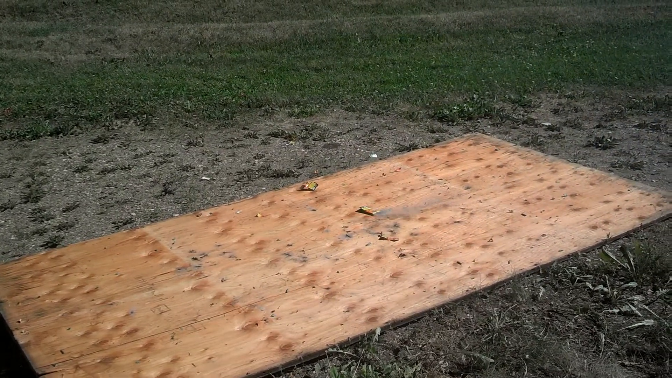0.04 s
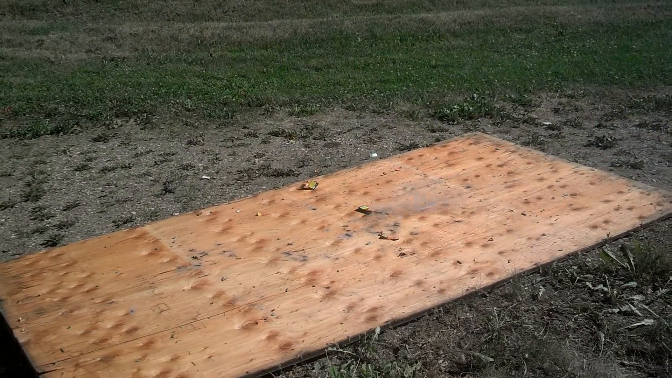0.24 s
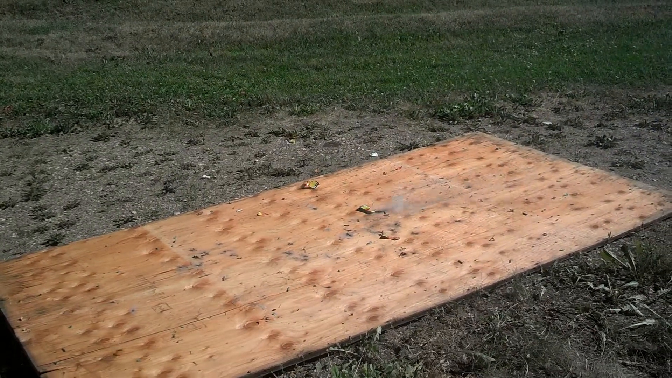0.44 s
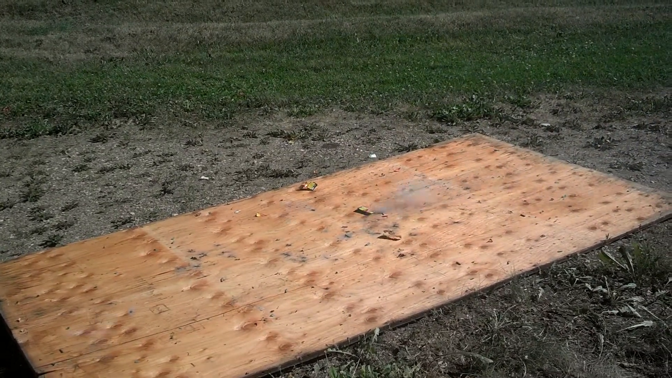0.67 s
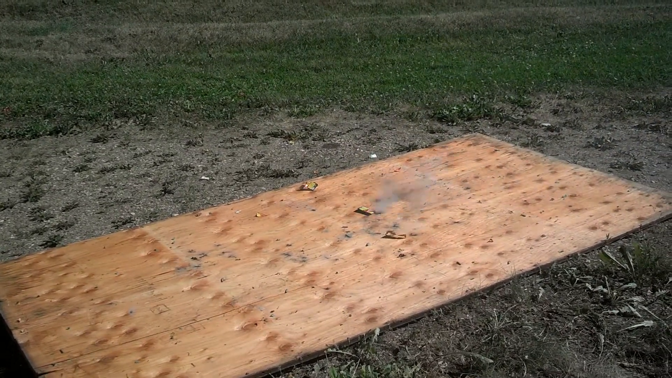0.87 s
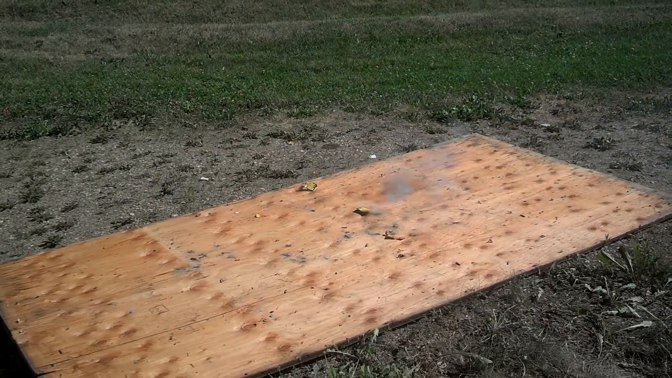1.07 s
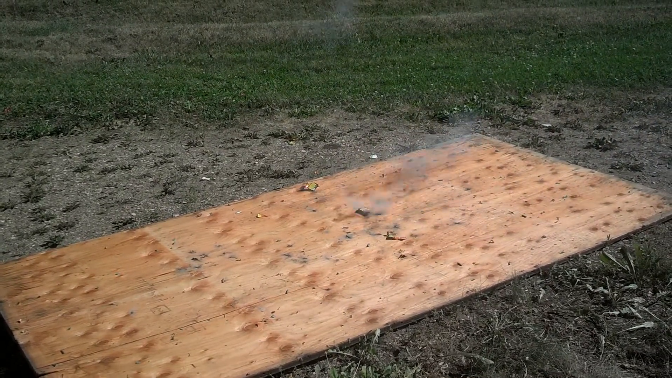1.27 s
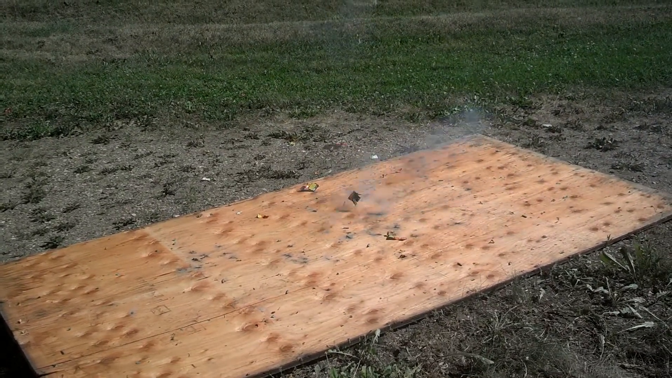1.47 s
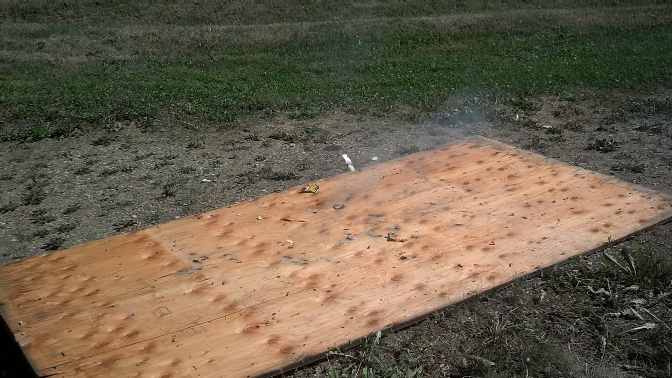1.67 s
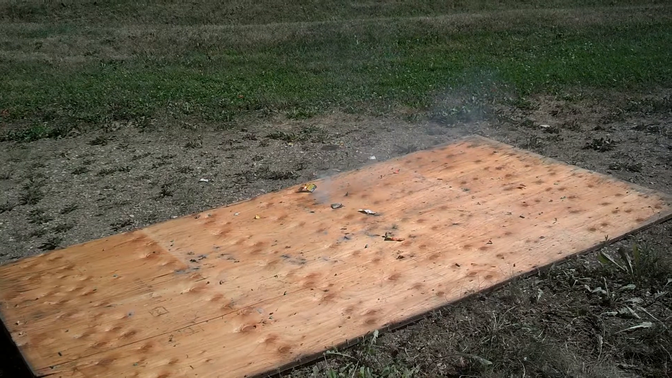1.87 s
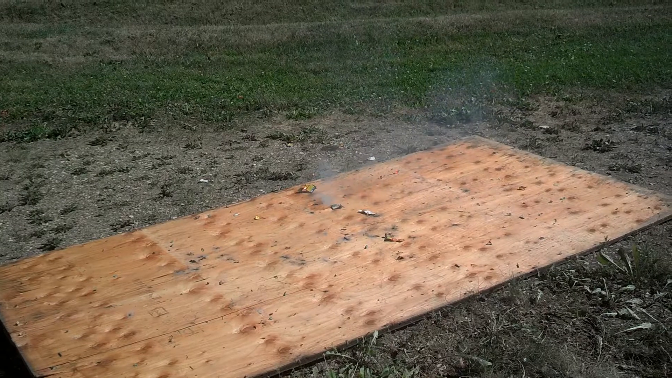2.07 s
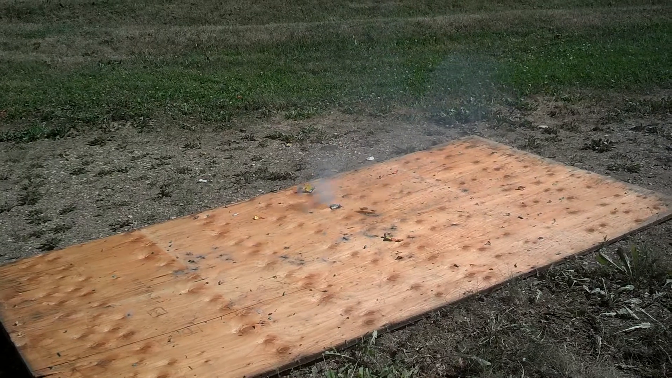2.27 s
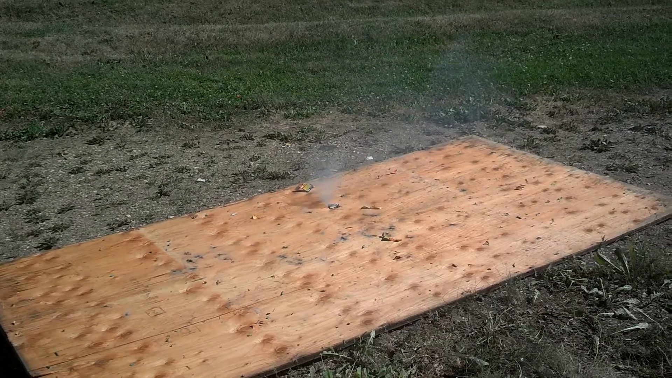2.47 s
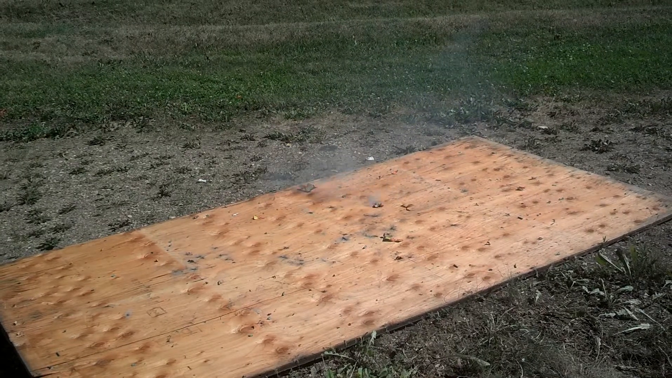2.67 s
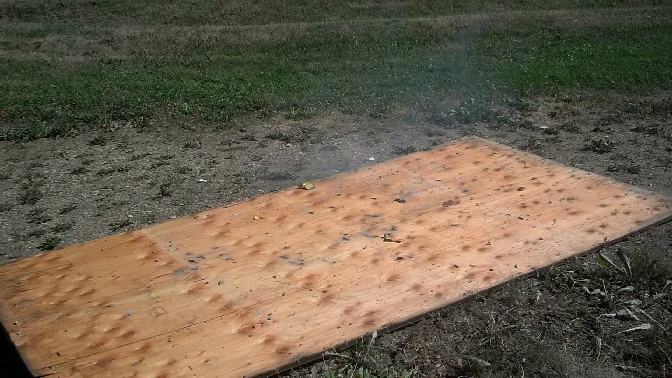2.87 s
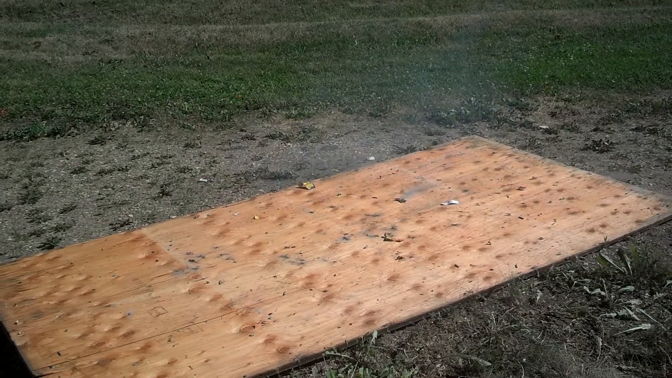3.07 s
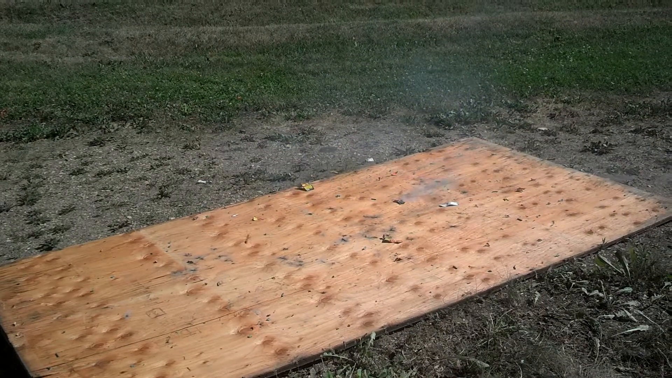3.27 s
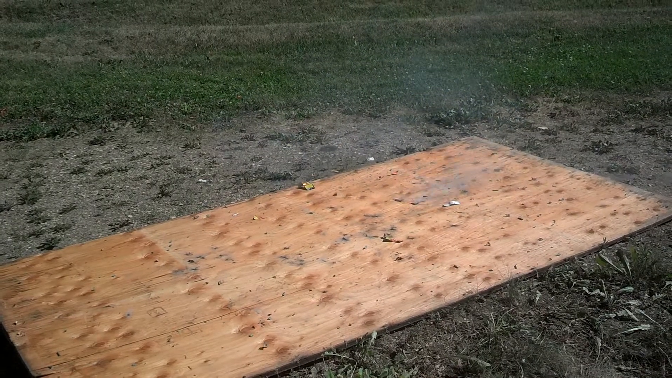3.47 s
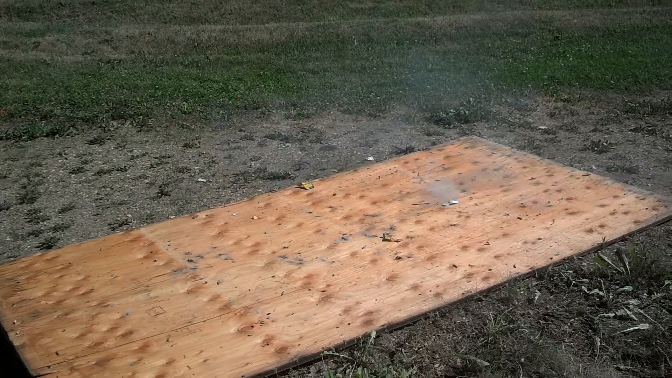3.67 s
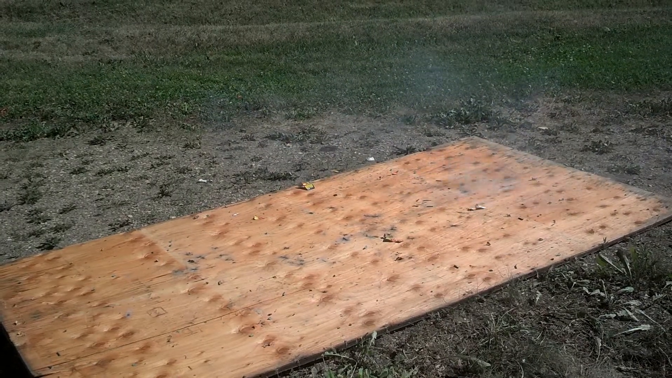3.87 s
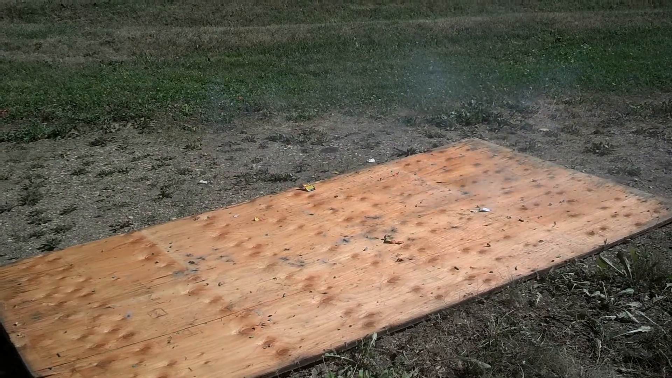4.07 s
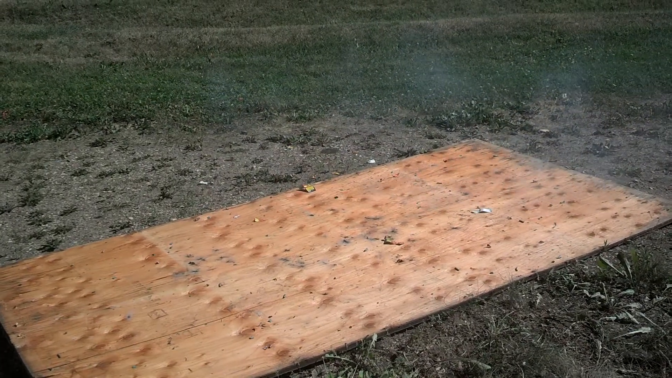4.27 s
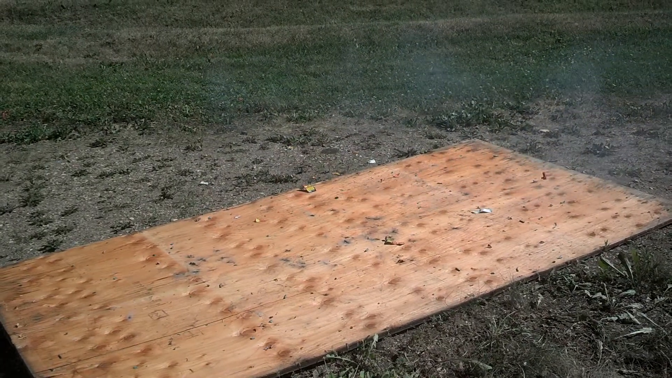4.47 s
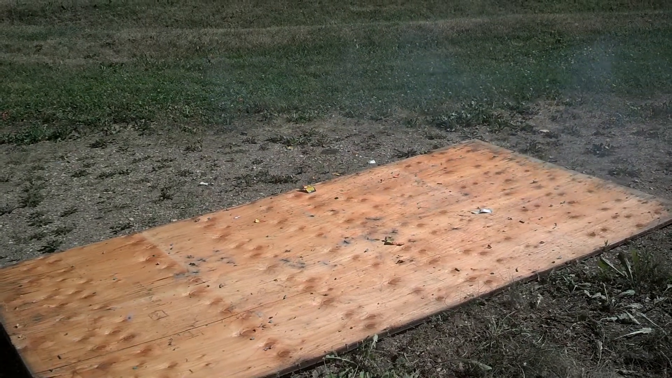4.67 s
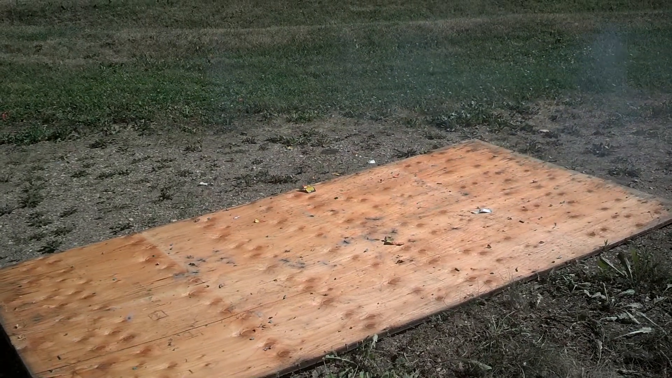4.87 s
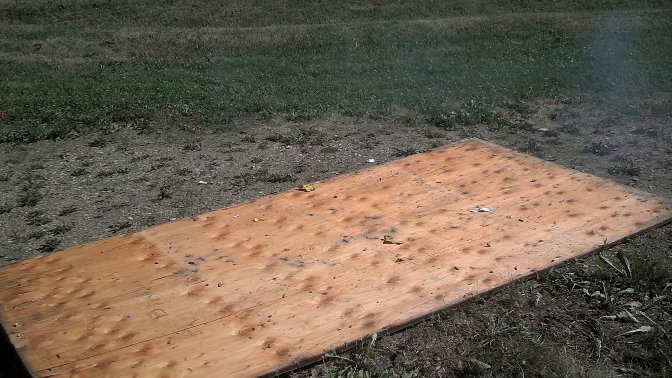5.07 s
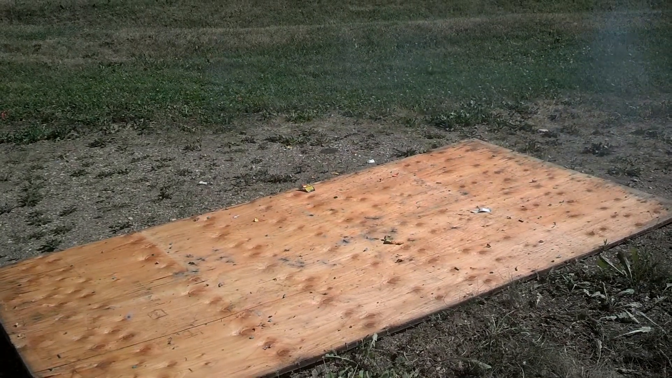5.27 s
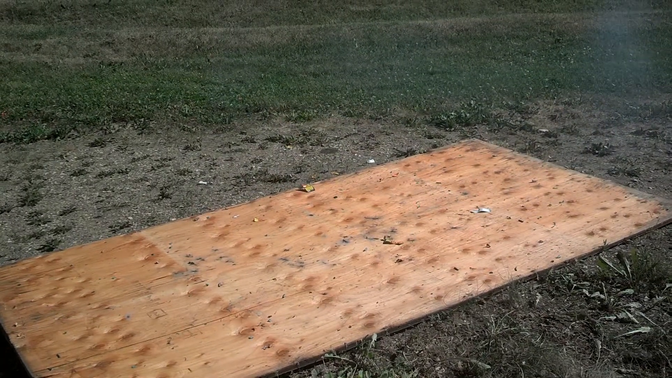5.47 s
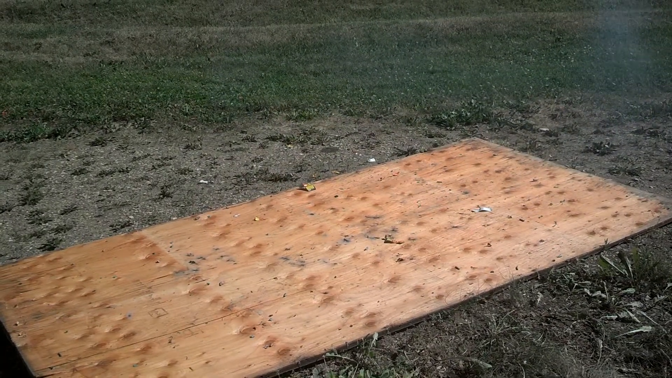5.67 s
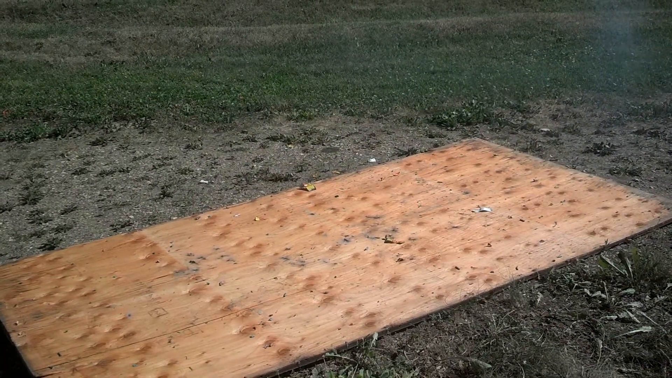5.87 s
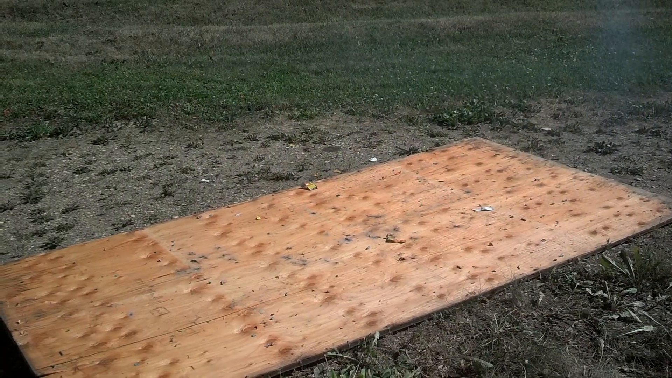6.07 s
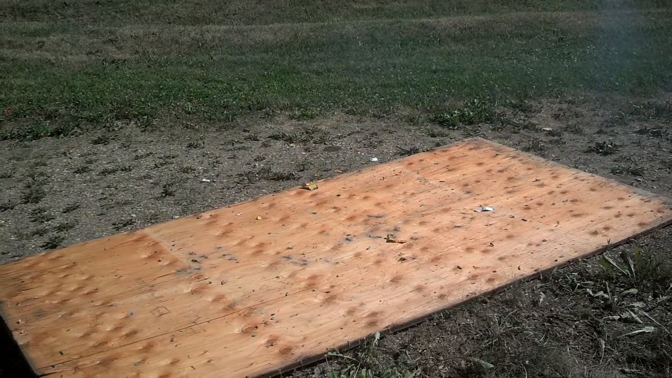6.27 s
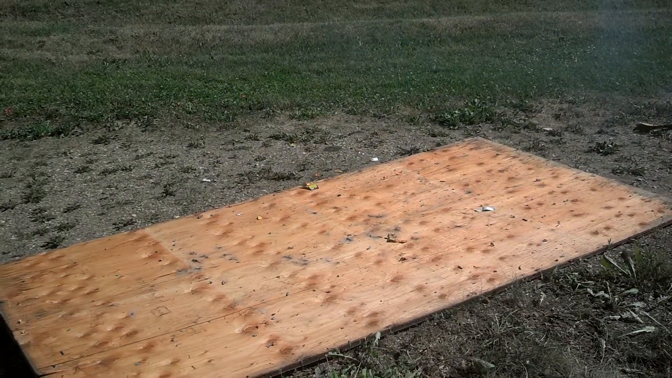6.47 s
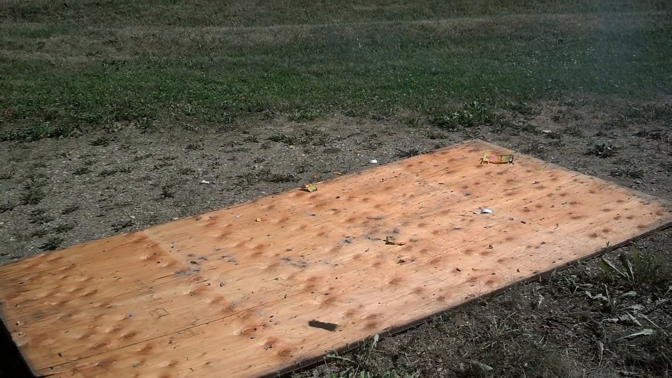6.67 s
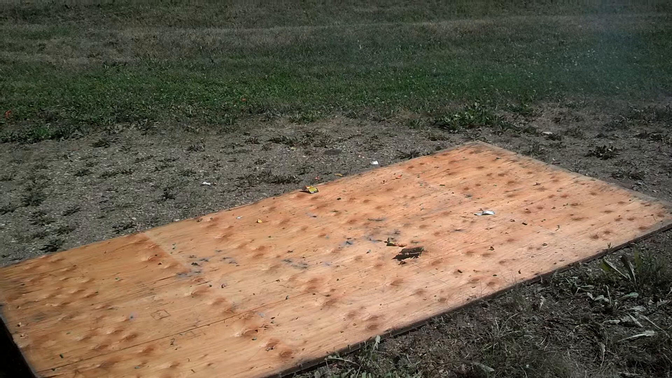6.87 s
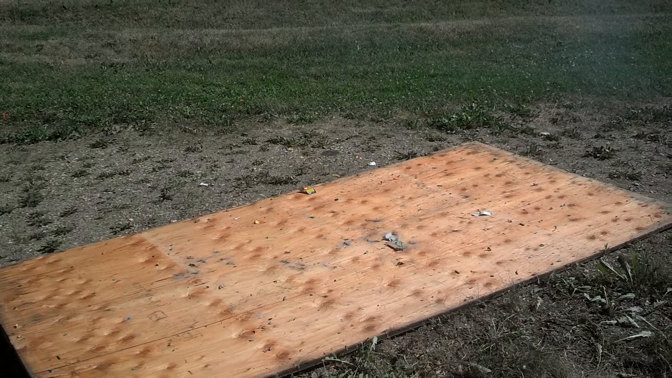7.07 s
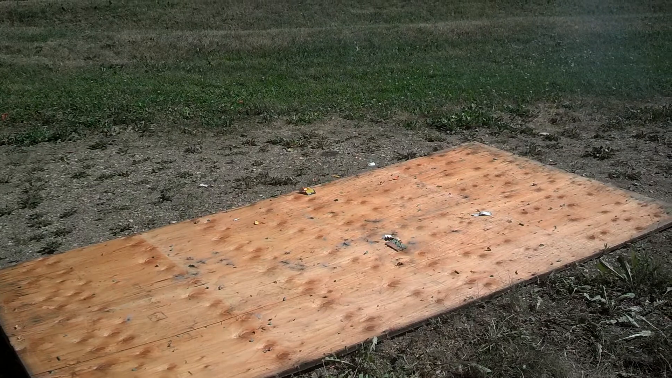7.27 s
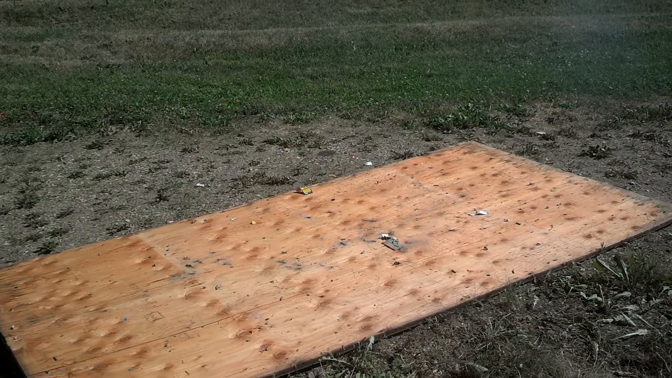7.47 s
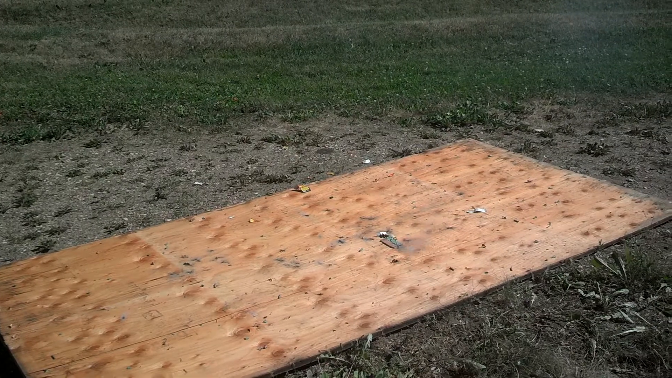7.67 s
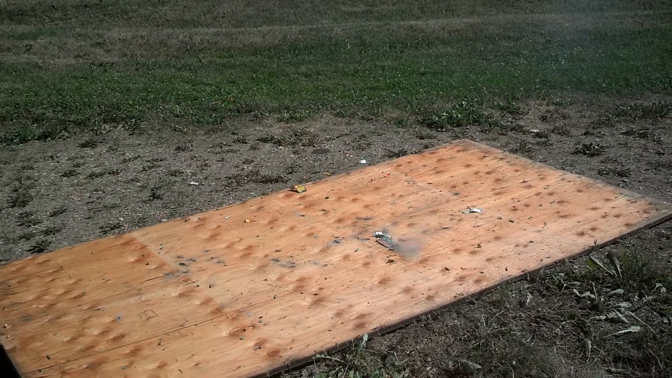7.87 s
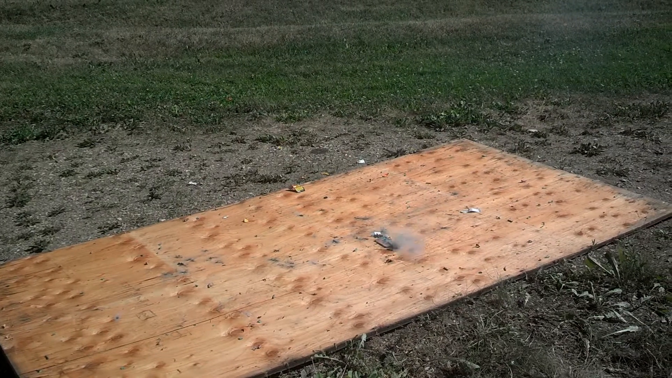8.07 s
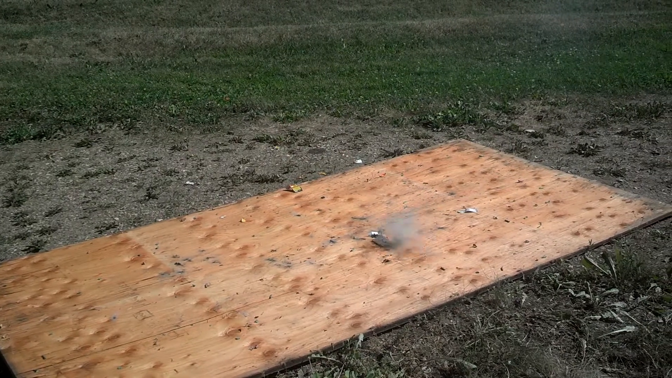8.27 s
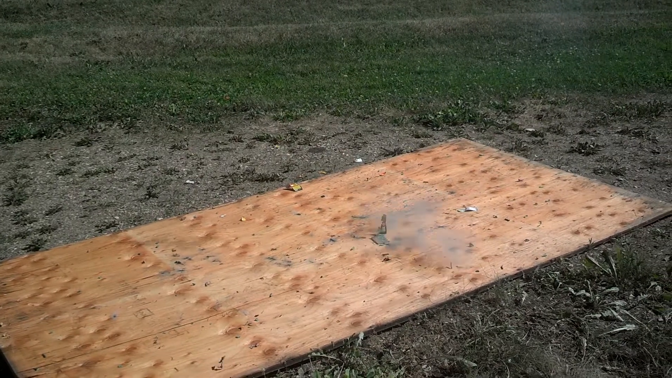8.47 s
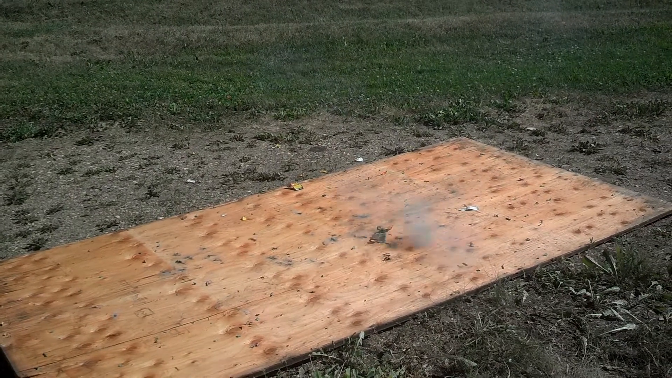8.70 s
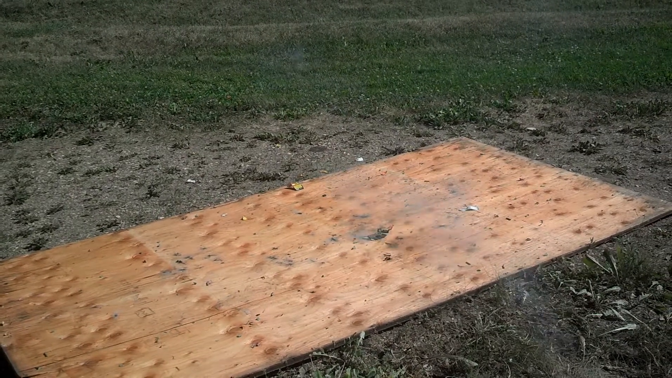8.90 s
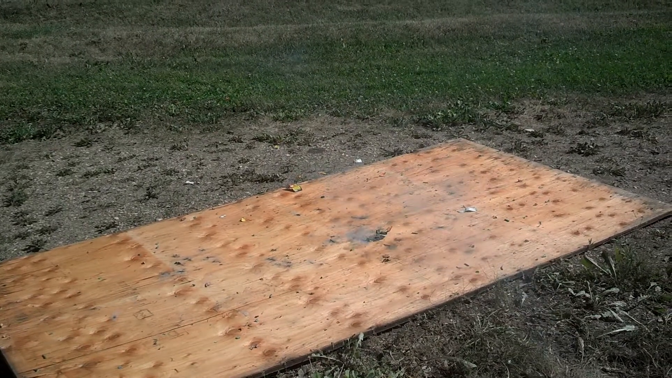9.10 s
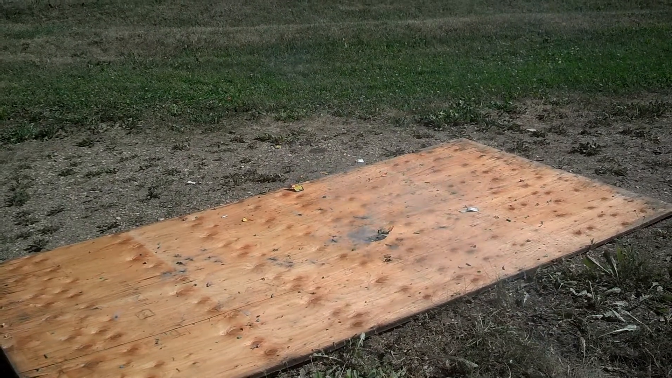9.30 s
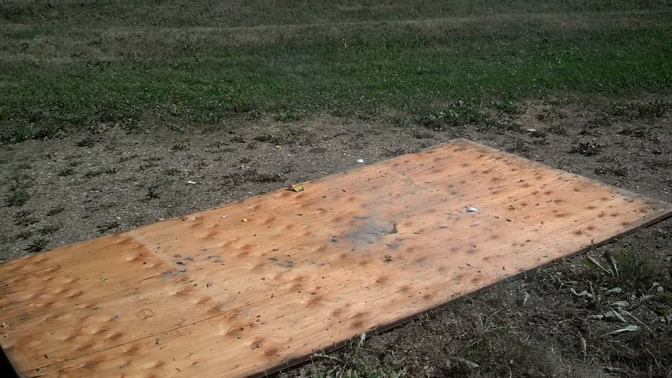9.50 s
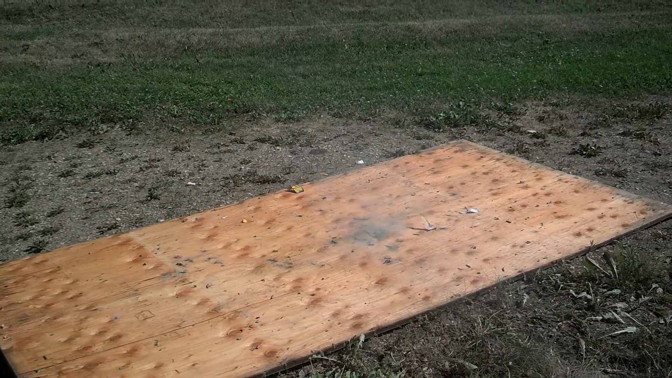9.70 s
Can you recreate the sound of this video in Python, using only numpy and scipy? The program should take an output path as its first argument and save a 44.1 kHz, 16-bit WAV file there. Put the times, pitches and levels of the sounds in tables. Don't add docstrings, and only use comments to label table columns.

```python
import sys
import numpy as np
from scipy import signal
from scipy.fft import rfft, irfft, next_fast_len
from scipy.io import wavfile
from scipy.ndimage import uniform_filter1d

SR = 44100
rng = np.random.default_rng(int(sys.argv[2]) if len(sys.argv) > 2 else 0)


def volts_from_decibels(level):
    exponent = np.asarray(level, float) / 20
    return 10 ** exponent


def wav_record(signal):
    frames = np.transpose(np.atleast_2d(signal))
    bounded = np.clip(frames, -1, 1)
    quanta = np.round(bounded * 32767).astype(np.int16)
    wavfile.write(sys.argv[1], SR, quanta)


N = 429534
CONTROL_STEP = 32


def rms_one(x):
    return x / np.sqrt(np.mean(x ** 2, axis=-1, keepdims=True) + 1e-20)


def in_time(rows):
    s, *columns = np.transpose(rows)
    return [np.interp(np.arange(N) / SR, s, column) for column in columns]


def band(x, low_hz, high_hz, order=2):
    edges_hz = [max(low_hz, 10), min(high_hz, .45 * SR)]
    return signal.sosfilt(signal.butter(order, edges_hz, "band", fs=SR, output="sos"), x)


def coloured(spectrum, alike):
    hz, level_db = np.transpose(spectrum)
    size = next_fast_len(N)
    shared, left, right = rng.standard_normal((3, size))
    pair = np.sqrt(alike) * shared + np.sqrt(1 - alike) * np.array([left, right])
    bin_hz = np.arange(size // 2 + 1) * SR / size
    shape = volts_from_decibels(np.interp(np.log(bin_hz + 1), np.log(hz), level_db))
    return rms_one(irfft(rfft(pair) * shape, size)[:, :N])


EARLIER_BANG_S = -1.7
GAIN_HOLD_S, GAIN_RISE_DB_PER_S, GAIN_TOP_DB = 1.05, 9.5, 19


def opened_db(s):
    bangs = STRING_ONE_START + STRING_ONE_END + STRING_TWO
    bang_s = np.array([EARLIER_BANG_S] + [row[0] for row in bangs])
    since_s = s - bang_s[np.searchsorted(bang_s, s) - 1]
    rise_db = np.maximum(since_s - GAIN_HOLD_S, 0) * GAIN_RISE_DB_PER_S
    return GAIN_TOP_DB * np.tanh(rise_db / GAIN_TOP_DB)


# pitch_hz, level_db (per Hz)
RUMBLE_SPECTRUM = [(40, -10), (120, 2), (300, .5), (700, -8.5), (1500, -17), (3500, -21.5), (7000, -30.5),
                   (12000, -38.5), (15500, -38)]
RUMBLE_DB = -71.2
SPIT_PUFF_DB = -5


def rumble(gain_db, spits):
    level = np.hypot(volts_from_decibels(RUMBLE_DB + gain_db), volts_from_decibels(SPIT_PUFF_DB) * spits)
    return level * volts_from_decibels(4.5) * coloured(RUMBLE_SPECTRUM, alike=0.65)


# pitch_hz, level_db (per Hz)
FUSE_SPECTRUM = [(800, -18), (2000, 3), (4000, -2.5), (7000, 0), (10000, -3.5), (13500, -9.5), (15300, 1.5)]
# start_s, level_db
FUSE_BURN = [(0, -78), (.19, -72), (.5, -76), (4.2, -92), (5.45, -99), (5.6, -81), (5.9, -86), (6.85, -86),
             (7.04, -79), (7.2, -82), (7.35, -73), (8.3, -71), (8.7, -67), (8.78, -88), (9.4, -80)]


def fuse(gain_db, spits):
    sputter = rms_one(band(rng.standard_normal(N), 8, 60, order=1))
    burn_db, = in_time(FUSE_BURN)
    level = np.hypot(volts_from_decibels(burn_db + gain_db), spits)
    return level * volts_from_decibels(2.0 + 1.4 * sputter) * coloured(FUSE_SPECTRUM, alike=0.052)


# peak_s, peak_db, fall_db_per_ms
SPITS = [(2.142, -42, 2.5), (9.03, -58, 1.5), (5.52, -70, .6), (5.6, -73, .3), (6.29, -65, .5),
         (6.44, -66, .25), (6.9, -31, 3.5), (7.03, -60, .3), (7.12, -56.5, .4), (7.34, -54, .2),
         (7.49, -58, .15), (7.82, -45, .2), (8.17, -51, .06), (9.306, -58, .6)]


def background():
    t = np.arange(0, N, CONTROL_STEP) / SR
    gain_db, = in_time(np.c_[t, opened_db(t)])
    spit_level = sum(volts_from_decibels(peak_db - fall * 1000 * np.abs(t - s)) for s, peak_db, fall in SPITS)
    spits, = in_time(np.c_[t, spit_level])
    return rumble(gain_db, spits) + fuse(gain_db, spits)


# start_s, left_minus_right_db, hollow_boom_db
PLACE = [(.2, 5.5, -3), (.7, -4, 5), (1.1, -2, 0), (1.5, -12, 2), (2.3, 9, -5), (2.6, -7, -6),
         (2.75, -9, 2), (3.3, -10, -2), (3.6, -4, 5), (4.2, 2.5, 3), (8.3, 6, -3), (8.45, -9, 7),
         (8.73, 5, 2), (9.41, -5, 1), (9.58, .5, 4)]
# start_s, crack_db, body_rel_db, sizzle_rel_db, length_ms
STRING_ONE_START = [(0.1994, -14.5, -2, -3.5, 4.5), (0.6043, -18, -2, -2, 5.4), (0.6223, -28, -6, -3, 2.7),
                    (0.7793, -17, -2.5, -6, 4.6), (0.7953, -18, -1, -7, 8.1), (1.0436, -14, -10, -9.5, 5.7),
                    (1.1031, -12, -7.5, -7, 6), (1.1513, -16, -4.5, -4.5, 7.5),
                    (1.1669, -18, -1.5, -2.5, 19), (1.3256, -19, -3.5, -4.5, 4.7),
                    (1.4492, -15.5, -2.5, -8, 5.9), (1.545, -21, -3.5, -3.5, 5.3),
                    (1.7268, -16.5, 5.5, -12, 4.3), (1.8952, -19, 2, -9, 6.5),
                    (2.1526, -18.5, .5, -5.5, 4.9), (2.2902, -18.5, -1, -2.5, 6.6),
                    (2.3023, -26.5, -8, -3, 6.6)]
# start_s, crack_db, body_rel_db, sizzle_rel_db, length_ms
STRING_ONE_END = [(2.5817, -15.5, -1.5, -7.5, 5.4), (2.6089, -18, -2, -14.5, 4.3),
                  (2.693, -25.5, -5, -8.5, 1.9), (2.7311, -21, -2, -3.5, 3.2),
                  (2.7381, -22.5, 2.5, -5, 10.7), (3.0762, -19, 4, -8, 3.4), (3.1578, -22, -3, -6.5, 3.9),
                  (3.3218, -20.5, 5, -7.5, 2.5), (3.428, -24, 6, -10.0, 2.36),
                  (3.5538, -20.5, -3, -12, 2.1), (3.5988, -16.5, -6, -6, 3.4), (3.6523, -21, 9, -4.5, 4.5),
                  (3.6644, -16.5, -4.5, -4.5, 4.6), (3.9217, -23.5, 6.5, -4.5, 5),
                  (3.9333, -17, 4, -4.5, 5.1), (3.9507, -27, 5.5, -6.5, 2.2),
                  (4.0217, -15.5, -1.1, -6, 6.5), (4.2081, -18, -0.5, -3.5, 4.1)]
# start_s, crack_db, body_rel_db, sizzle_rel_db, length_ms
LANDING = [
    (6.896, -25, -2, -4, 4.5),
    (6.995, -53.5, -8, -5, 2.2),
    (7.015, -54, -6, -3.5, 2),
    (7.113, -53.5, -2, -0.5, 3.4),
]
# start_s, crack_db, body_rel_db, sizzle_rel_db, length_ms
STRING_TWO = [(8.3149, -11, -2, -5.5, 3.1), (8.3771, -17, -0.5, -5.5, 7), (8.3911, -17.1, -1.3, -5, 12.4),
              (8.4516, -20.5, 3, -10.5, 3.7), (8.5124, -15, -3, -9, 7.1), (8.5413, -20, 4.5, -6, 7.7),
              (8.6934, -40, -20.5, -18, 3.1), (8.7327, -15, -4, -6, 6.4), (8.7757, -16, -2, -6.5, 12.3),
              (9.4142, -14, -0.7, -8.5, 3.04), (9.5814, -16.5, -4, -5.5, 3.2)]
USUAL_MS = 5
THUMP_DB, THUMP_PER_BODY, SLAP_THUMP_DB = -1.5, .45, -25
ECHO_DB, ECHO_PER_SIZZLE, ECHO_PER_DOUBLING, SLAP_ECHO_DB = 4.0, .55, 1.6, -18
CLAMP_FROM_DB, CLAMP_SHARE = 8, 1.3


def crackers():
    size = 2048
    out, sent, fronts = np.zeros((3, 2, N + size))
    t = np.arange(size) / SR
    body_hz, crack_hz, snap_hz, sizzle_hz, air_hz, top_hz = 280, 820, 2100, 4500, 9000, 16500
    place_s, side_db, boom_db = np.transpose(PLACE)
    for row in STRING_ONE_START + STRING_ONE_END + LANDING + STRING_TWO:
        s, crack_db, body_db, sizzle_db, length_ms = row
        thump_db = THUMP_DB + THUMP_PER_BODY * body_db + np.interp(s, place_s, boom_db)
        echo_db = ECHO_DB + ECHO_PER_SIZZLE * sizzle_db
        echo_db += ECHO_PER_DOUBLING * np.log2(length_ms / USUAL_MS)
        echo_db -= CLAMP_SHARE * max(opened_db(s) - CLAMP_FROM_DB, 0)
        if row in LANDING:
            thump_db, echo_db = SLAP_THUMP_DB, SLAP_ECHO_DB

        noise = rng.standard_normal((5, size))
        life = t / (max(length_ms, 1) * 0.00029)
        smoulder = 0.028 * np.exp(-t / 0.017) * (1 - np.exp(-life))
        flare = life ** 0.93 * np.exp(-life) + smoulder
        burst = (noise[:2] + .5 * noise[4]) * flare
        shock = np.exp(-t / 0.0012) * (1 - t / 0.00044)
        burst += shock * volts_from_decibels(-1.2 * sizzle_db - 27.5)
        push = life * np.exp(-.8 * life) * (.5 + 3.7 * noise[2:4])

        parts = [(band(band(push, 98, 370), 75, 670), thump_db + 0.5),
                 (band(burst, body_hz, crack_hz), body_db - 2),
                 (band(burst, crack_hz, snap_hz), -5.6),
                 (band(burst, snap_hz, sizzle_hz), 0.39 * sizzle_db - 3),
                 (band(burst, sizzle_hz, air_hz), sizzle_db - 9),
                 (band(burst, air_hz, top_hz), sizzle_db - 11)]
        blast = np.zeros((2, size))
        for k, (part, part_db) in enumerate(parts):
            sign = (-1) ** k
            blast += sign * volts_from_decibels(part_db) * rms_one(part)

        snap = noise[2:4] * np.exp(-t / .0008)
        front = rms_one(band(snap, 400, 9000 * volts_from_decibels(1.5 * sizzle_db), order=1))
        front *= min(USUAL_MS / length_ms, 1) ** .7

        lean_db = np.interp(s, place_s, side_db) * np.array([[.5], [-.5]])
        at = round(s * SR)
        span = slice(at, at + size)
        out[:, span] += volts_from_decibels(crack_db + lean_db - 9.5) * blast
        sent[:, span] += volts_from_decibels(crack_db + lean_db + echo_db - 9.5) * blast
        fronts[:, span] += volts_from_decibels(crack_db + echo_db - 9.5) * front
    return out[:, :N], sent[:, :N], fronts[:, :N]


# centre_hz, early_db, early_t60_s, late_db, late_t60_s
SCATTER = [(185.7, -42.5, 0.25, -66.5, 0.3), (370, -36.5, 0.14, -50.5, 0.5), (740, -29.5, 0.066, -48, 0.52),
           (1720, -41.5, 0.14, -50.5, 0.97), (2800, -37.5, 0.15, -45, .75), (4500, -42, 0.074, -47, 0.82),
           (6600, -39.5, 0.051, -43, 0.58), (9500, -39.5, 0.17, -45.5, .43), (14000, -36, .12, -40, 0.33)]


def scattered_tail(blasts):
    t = np.arange(SR // CONTROL_STEP) * CONTROL_STEP / SR
    white = rng.standard_normal((2, 2, N))
    clumps = rms_one(band(rng.standard_normal((2, N)), 30, 200, order=1))[:, ::CONTROL_STEP]
    centres_hz = np.transpose(SCATTER)[0]
    edges_hz = np.r_[120, np.sqrt(centres_hz[1:] * centres_hz[:-1]), 16500]
    out = np.zeros((2, N))
    for k, (_, early_db, early_t60_s, late_db, late_t60_s) in enumerate(SCATTER):
        low, high = edges_hz[k], edges_hz[k + 1]
        fade = volts_from_decibels(early_db - 60 * t / early_t60_s) ** 2 + volts_from_decibels(late_db - 60 * t / late_t60_s) ** 2
        fade *= np.clip((t - .006) / 0.0076, 0, 1)
        power = np.mean(band(blasts, low, high) ** 2, axis=0)
        power = uniform_filter1d(power, size=CONTROL_STEP)[::CONTROL_STEP]
        returned = signal.fftconvolve(power, fade)[:len(power)]
        level = np.sqrt(np.abs(CONTROL_STEP * returned))
        level *= volts_from_decibels(1.4 * clumps[0] + 1.5 * np.roll(clumps[1], 500 * k))
        level = np.interp(np.arange(N) / CONTROL_STEP, np.arange(len(level)), level)
        out += level * band(white[k % 2], low, high) / np.sqrt(2 * (high - low) / SR)
    return out


# delay_s, left_db, right_db, low_hz, top_hz
WALLS = [
    (.0135, -13.5, -16.5, 1800, 7980),
    (.018, -18, -19.5, 900, 5045),
    (.030, -17.5, -21, 700, 4025),
    (.038, -17, -16, 600, 3000),
    (.0678, -14.5, -18.5, 1000, 9970),
    (.255, -41.5, -45.5, 1500, 6040),
]


def wall_echoes(fronts):
    out = np.zeros((2, N))
    for delay_s, left_db, right_db, low_hz, top_hz in WALLS:
        lag = round(delay_s * SR)
        bounce = band(fronts, low_hz, top_hz, order=1)
        out[:, lag:] += volts_from_decibels(np.array([[left_db], [right_db]])) * bounce[:, :N - lag]
    return out


# start_s, peak_db, edge_rel_db
STRONG_EDDIES = [(4.984, -38, -18), (5.006, -33, -11.5), (6.249, -27.5, -25), (6.417, -30, -24),
                 (6.915, -21.5, -15), (6.941, -24, -18), (7.114, -19.5, -27), (7.153, -22.5, -20),
                 (7.179, -21.5, -25), (7.232, -20, -3.5), (7.251, -12.5, -25), (7.309, -22, -29),
                 (7.33, -14.5, -25), (7.389, -10, -11.5), (7.42, -16, -15), (7.458, -12.5, -8),
                 (7.487, -14.5, -3), (7.539, -23, -24), (7.571, -15, -24), (7.634, -14, -22.5),
                 (7.694, -25, -27), (7.721, -14, -18), (7.78, -13, -27), (7.807, -18.5, -17),
                 (7.847, -12, -11), (7.906, -28, -28), (7.99, -24, -25), (8.056, -25.5, -7),
                 (8.08, -19, -24), (8.231, -26, -30)]
TRAIL_S, TRAIL_DB, TRAIL_EDGE_DB = .018, -8, -24
# start_s, level_db
BREEZE = [(4.9, -50), (5.2, -60), (5.55, -49), (6.0, -54), (6.33, -37), (6.8, -47), (7.1, -34), (7.5, -28),
          (8.35, -32)]
SMALL_EDDIES = 45


def eddies():
    strong_s, strong_db, _ = np.transpose(STRONG_EDDIES)
    lag, loss = rng.random((2, len(strong_s)))
    shed_s = strong_s + TRAIL_S * (.5 + lag)
    shed_db = strong_db + TRAIL_DB * (.5 + loss)
    when, size = rng.random((2, SMALL_EDDIES))
    small_s = BREEZE[0][0] + when * (BREEZE[-1][0] - BREEZE[0][0])
    small_db = np.interp(small_s, *np.transpose(BREEZE)) + 10 * (size - .5)
    weak = zip(np.r_[shed_s, small_s], np.r_[shed_db, small_db])
    return list(STRONG_EDDIES) + [(s, peak_db, TRAIL_EDGE_DB) for s, peak_db in weak]


def wind():
    size, lead = 2048, 512
    out = np.zeros(N + size)
    t = (np.arange(size) - lead) / SR
    for s, peak_db, edge_db in eddies():
        pitch, turn, side = rng.random(3)
        cycles = 95 * (1 + 1.1 * pitch) * t * (1 - 6 * t)
        width_s = np.where(t < 0, .005, .010)
        swing = np.exp(-(t / width_s) ** 2) * np.cos(2 * np.pi * (cycles + turn))
        heave = np.exp(-(t / 0.0058) ** 2) * np.cos(2 * np.pi * (55 * t + side))
        snap = np.exp(-np.abs(t / 0.0016) ** 1.3) * np.cos(2 * np.pi * (330 * t + side))
        at = round(s * SR) - lead
        out[at:at + size] += volts_from_decibels(peak_db - 2.0) * (swing + volts_from_decibels(-9) * heave + volts_from_decibels(edge_db + 12.5) * snap)
    return out[:N] * volts_from_decibels([[-30], [0]])


def scene():
    blasts, sent, fronts = crackers()
    return background() + blasts + scattered_tail(sent) + wall_echoes(fronts) + wind()


def roll_off(x):
    return signal.sosfilt(signal.butter(12, 16610, fs=SR, output="sos"), x)


WIDEN_LAG_SAMPLES, WIDEN_SHARE = 16, 1.06266


def record(dry):
    ports = dry + volts_from_decibels(-2) * band(dry, 9000, 22000)
    late = np.pad(ports[::-1], ((0, 0), (WIDEN_LAG_SAMPLES, 0)))[:, :N]
    wide = ports - WIDEN_SHARE * np.tanh(late / 1.08)
    mix = np.clip(1.755 * np.tanh(wide / 1.844), -1, 1)
    return roll_off(mix)


dry = scene()
out = record(dry)
wav_record(out)
```